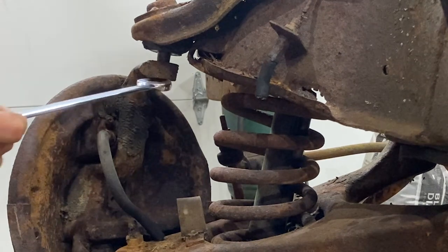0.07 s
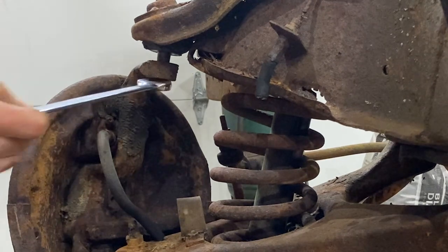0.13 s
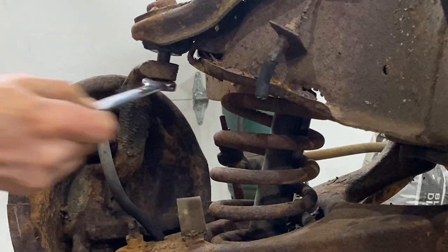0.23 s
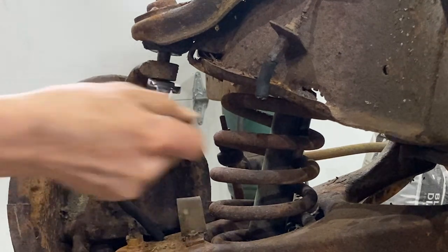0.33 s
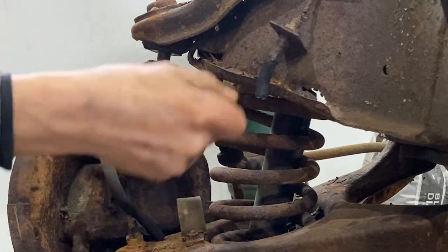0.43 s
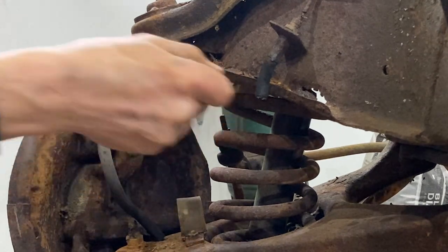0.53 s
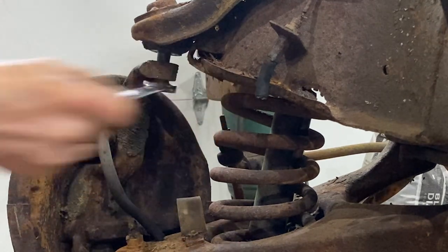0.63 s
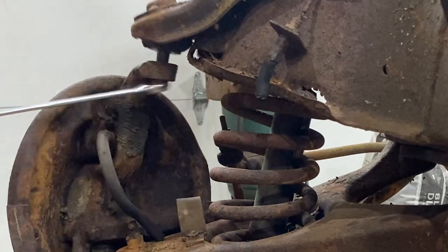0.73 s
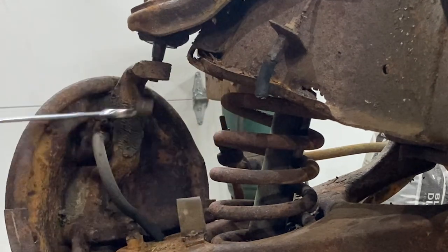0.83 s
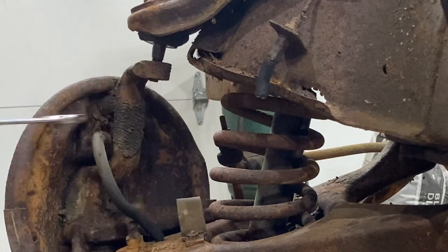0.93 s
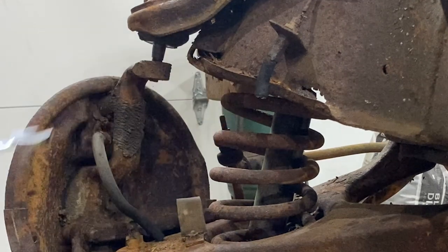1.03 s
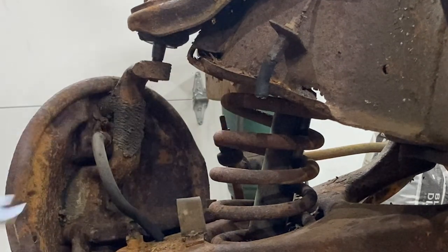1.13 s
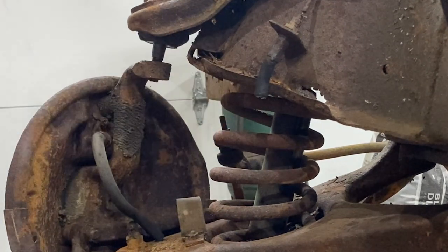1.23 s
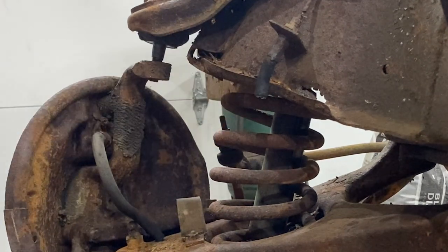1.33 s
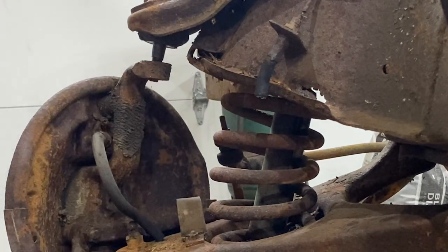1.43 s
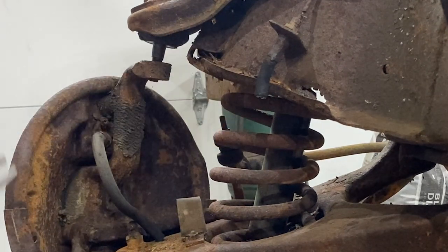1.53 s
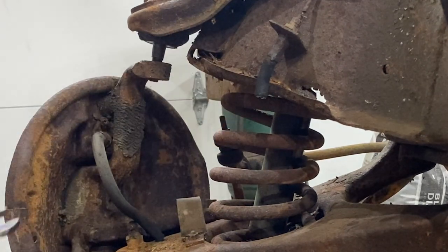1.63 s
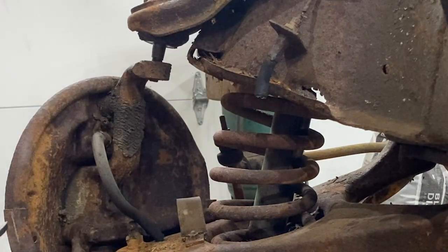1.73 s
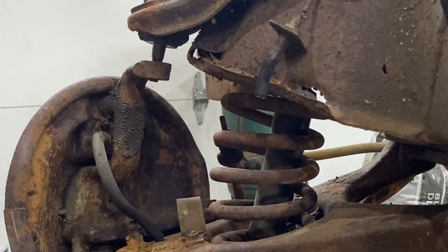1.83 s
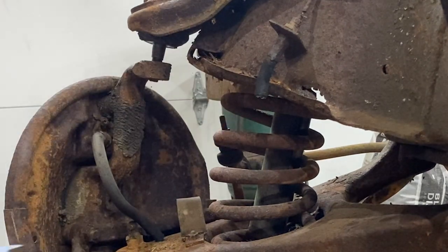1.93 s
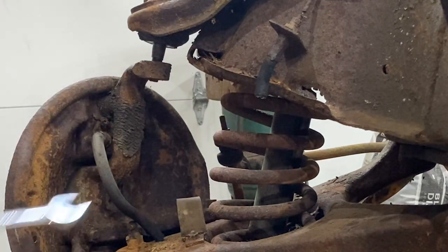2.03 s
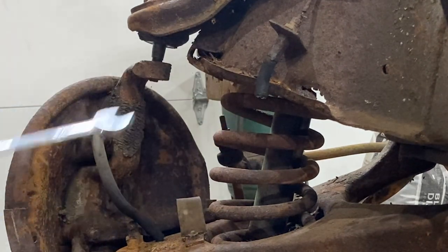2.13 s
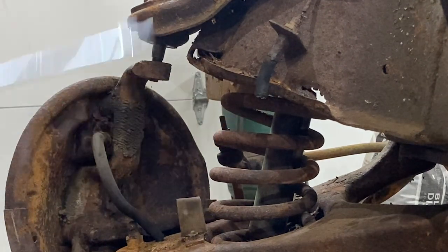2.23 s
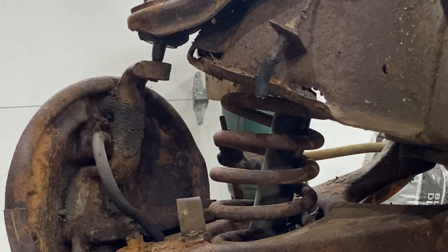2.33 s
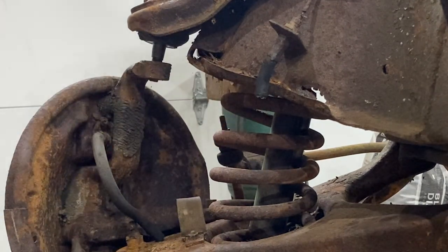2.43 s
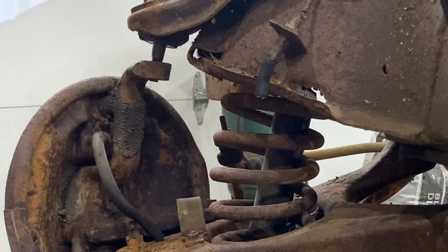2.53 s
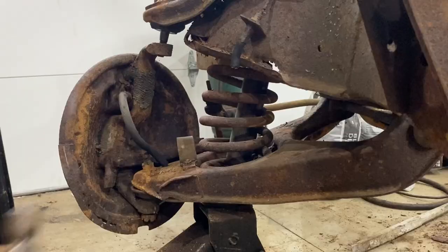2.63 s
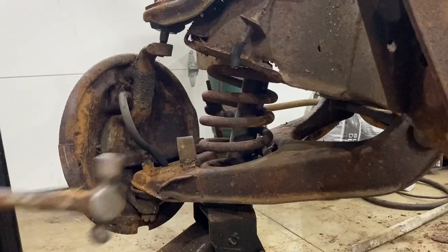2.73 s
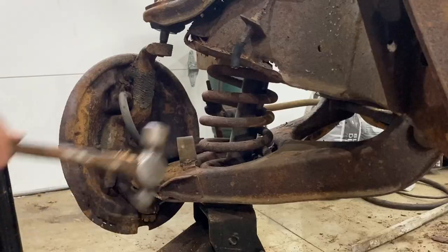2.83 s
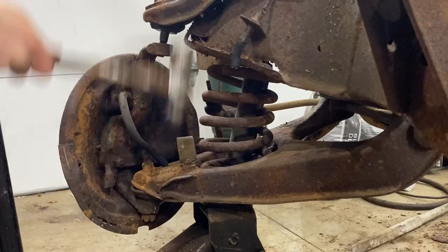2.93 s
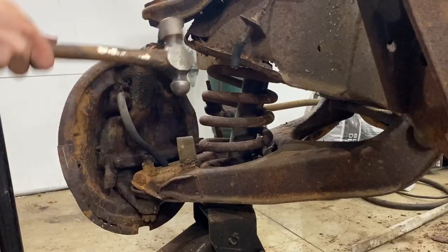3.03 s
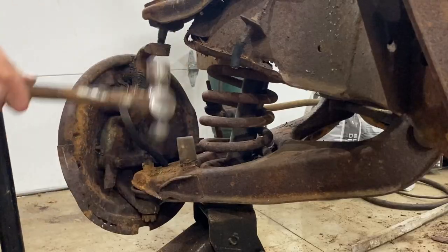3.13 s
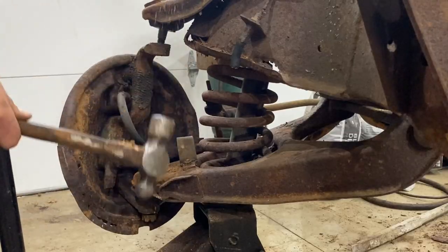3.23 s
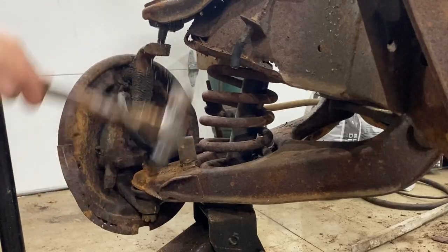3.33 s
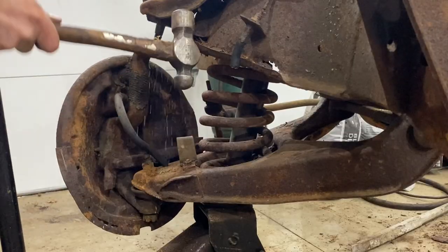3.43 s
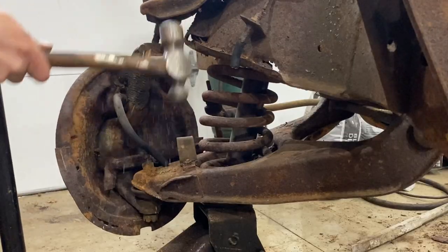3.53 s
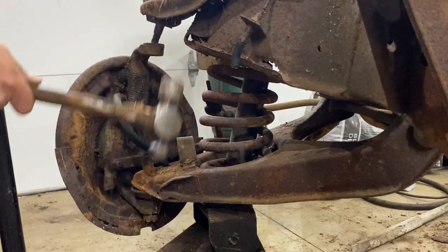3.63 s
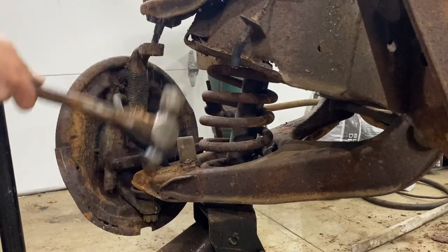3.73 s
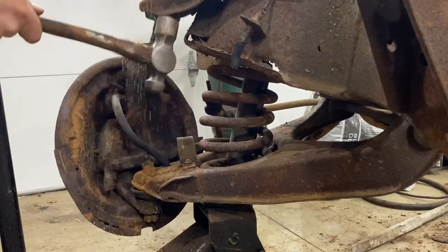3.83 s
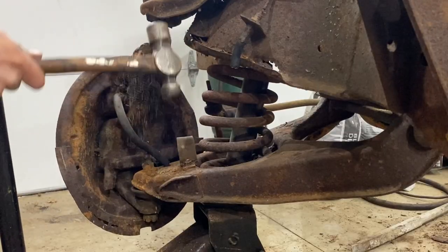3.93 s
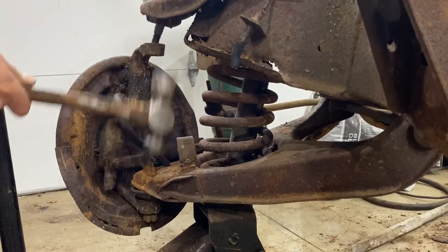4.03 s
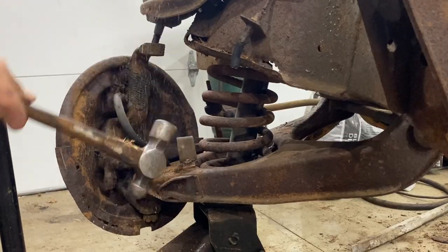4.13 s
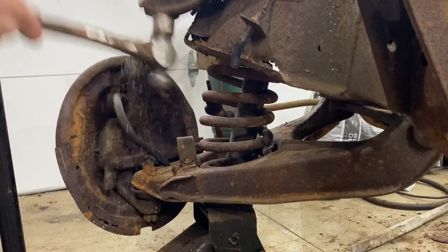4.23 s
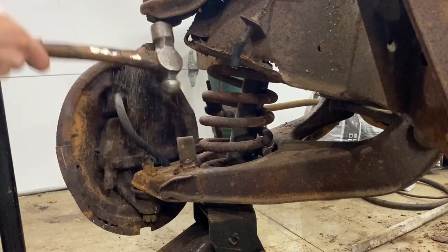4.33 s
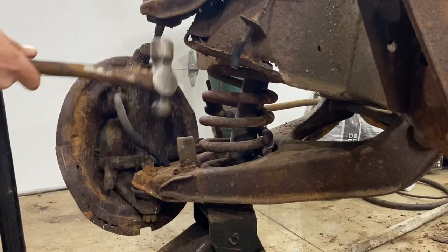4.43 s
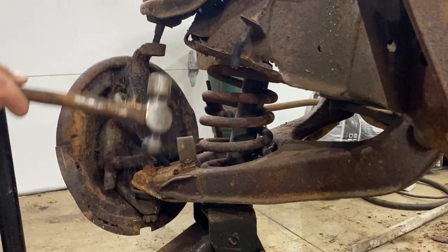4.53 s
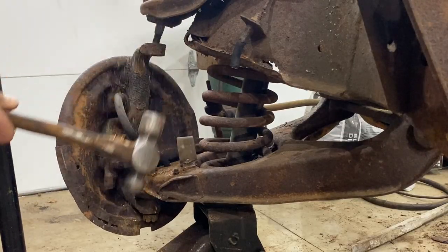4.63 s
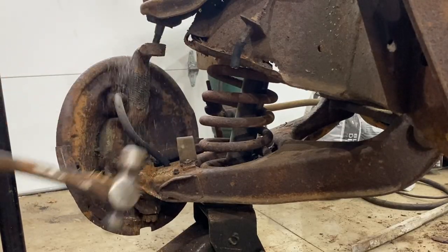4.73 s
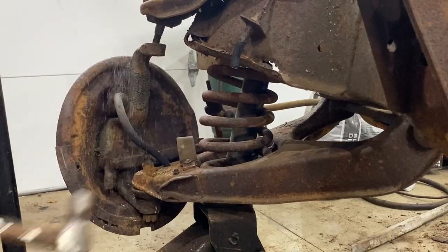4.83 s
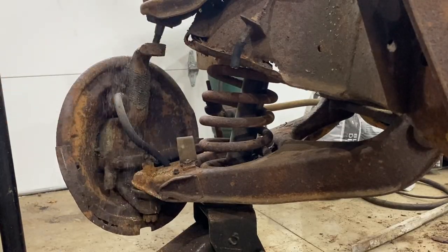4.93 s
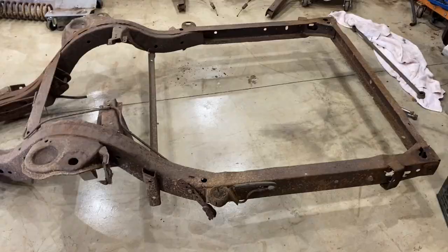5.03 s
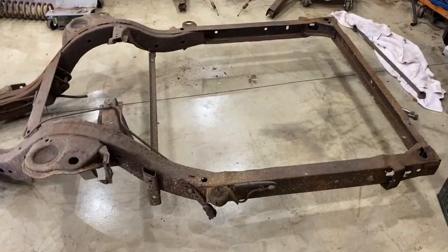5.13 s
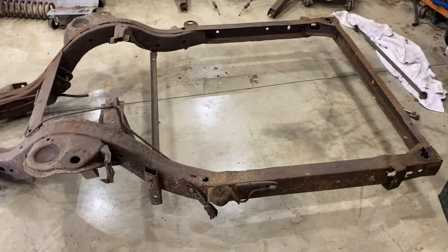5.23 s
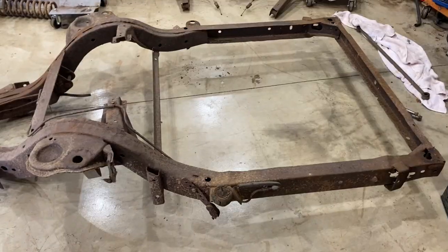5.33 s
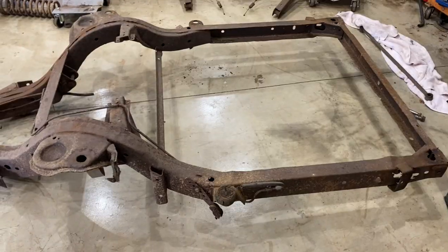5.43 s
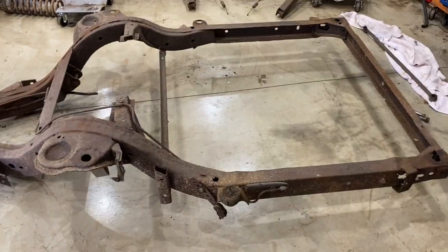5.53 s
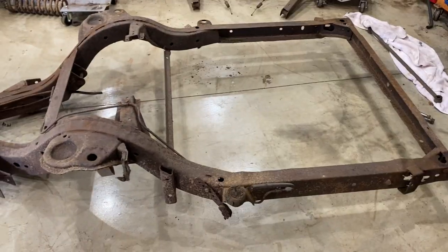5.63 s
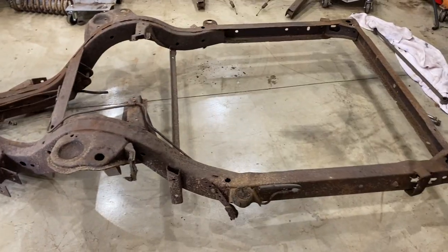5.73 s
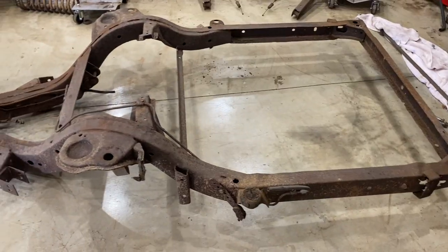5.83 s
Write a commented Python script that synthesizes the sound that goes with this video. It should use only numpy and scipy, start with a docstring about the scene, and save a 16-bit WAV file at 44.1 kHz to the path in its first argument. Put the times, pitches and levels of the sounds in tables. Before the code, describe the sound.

Stereo close recording with audible room noise: dull wrench clunks, one sharp knock, a hollow boom and scattered bright metallic clatter thinning out. Then four hammer strikes on thick rusty metal, the first two hardest, squeezed by automatic level control so the room's tail swells. Finally the tone switches abruptly to a low workshop hum with a faint whine.

```python
"""In a garage, a rusty front suspension is worked on. A wrench clinks on a nut, slips off and clatters down
over the steel, and hollow bodywork booms under a knock: each contact is decaying noise plus ringing modes,
weighted in bands. A steel hammer then hits the control arm four times; the recorder's limiter ducks the blows
and lets the room's tail rise again. Flakes of rust tick as short bursts of treble noise. Shaped noise is the
room tone; at about 5.1 s the background changes to a low steady hum, a sine with its own noise and a faint
whine."""
import sys
import numpy as np
from scipy import signal
from scipy.fft import rfft, irfft, next_fast_len
from scipy.io import wavfile
from scipy.ndimage import uniform_filter1d, minimum_filter1d

SR = 44100
rng = np.random.default_rng(int(sys.argv[2]) if len(sys.argv) > 2 else 0)


def dump_mix(stems):
    """Bounce the given channels to the path in sys.argv[1] as a 16-bit WAV at rate SR."""
    frames = np.atleast_2d(stems).T  # one column per channel
    limited = np.clip(frames, -1, 1)  # hard clip at full scale
    pcm = np.round(limited * 32767).astype(np.int16)
    wavfile.write(sys.argv[1], SR, pcm)


N = 258864

# Limits of the bands in which a contact is weighted. Each entry: frequency in Hz.
BAND_EDGES_HZ = [25, 200, 700, 1500, 3200, 6000, 10000, 16000]
# Centres of the same bands. Each entry: frequency in Hz.
BAND_CENTRES_HZ = [110, 400, 1050, 2200, 4400, 7700, 12600]

# Room tone near the wrench. Each row: frequency in Hz, relative spectral density in dB per Hz.
NEAR_TONE_SPECTRUM = [(25, -22.5), (60, -3), (95, 0.5), (150, -12.5), (300, -9.5), (600, -23.5),
                      (1200, -25.5), (2500, -29.5), (5500, -32.5), (8000, -34), (12000, -36),
                      (16000, -37.5)]
# Hushed room tone during and after the hammering. Each row: frequency in Hz, relative density in dB per Hz.
HUSHED_TONE_SPECTRUM = [(25, -16), (65, -2.5), (150, -18), (260, -1), (330, -3), (450, -17.5), (700, -22.5),
                        (2500, -36), (4000, -37), (16000, -46)]
# Steady tone beside the bare frame. Each row: frequency in Hz, relative density in dB per Hz.
FRAME_TONE_SPECTRUM = [(15, -41), (25, -14), (64, -6.5), (170, -24.5), (223, -27.5), (394, -36.5),
                       (439, -38), (545, -36.5), (677, -34), (887, -37.5), (962, -35), (1700, -38.5),
                       (2350, -36), (3080, -61), (16000, -84.5)]
# Course of the tone near the wrench. Each row: time in seconds, level in dB.
NEAR_TONE_LEVEL = [(0, -59), (.4, -49), (1.701, -52.5), (2.949, -53), (3.1, -56), (4.2, -61),
                   (4.599, -72.5)]
# Course of the hushed tone. Each row: time in seconds, level in dB.
HUSHED_TONE_LEVEL = [(3.0, -82.5), (3.301, -55), (5.081, -61.5), (5.102, -81.5)]
# Onset of the steady tone beside the frame. Each row: time in seconds, level in dB.
FRAME_TONE_LEVEL = [(5.1, -98.5), (5.122, -52.5)]
# Course of the faint whine beside the frame. Each row: time in seconds, level in dB.
WHINE_LEVEL = [(5.1, -120), (5.12, -72), (5.55, -89), (5.72, -66), (5.87, -68)]

# The wrench touches steel; a small part radiates little bass, a soft contact little treble.
# Each row: start in seconds, level in dB, bass corner in Hz, treble corner in Hz, clatter t60 in seconds,
# chassis ring in dB and wrench ring in dB, both against the clatter.
WRENCH_CONTACTS = [(0.071, -51.5, 693, 1000, 0.034, -10.5, -23.5), (0.092, -29, 685, 890, 0.3, 4.5, -15.5),
                   (0.138, -43, 710, 1710, 0.052, -17.5, -16), (0.167, -24.5, 680, 790, 0.15, -3.5, -17),
                   (0.4321, -11, 1900, 1470, 0.093, -11.5, -29), (0.801, -23.5, 150, 1500, 0.1, -17, -20.5),
                   (0.823, -32.5, 100, 3000, 0.37, -15, 0.5), (0.978, -32, 700, 1170, 0.13, -4, -26.5),
                   (1.029, -25.5, 600, 12000, 0.13, -6, -10.5),
                   (1.061, -34.5, 380, 15000, 0.03, -16, -12.5), (1.142, -31, 770, 5000, 0.096, -18, -18.5),
                   (1.2073, -15, 4450, 2500, 0.049, -5.5, -23),
                   (1.3068, -17.5, 2770, 3400, 0.039, -7.5, -14.5),
                   (1.345, -29, 3000, 1100, 0.12, -8.5, -18), (1.429, -25.5, 2000, 4800, 0.12, -10, -29),
                   (1.799, -17, 5400, 4740, 0.08, -9, -4), (1.855, -33, 3400, 3200, 0.18, -11.5, -30),
                   (2.062, -33.5, 1735, 2300, 0.1, -7.5, -3.5), (2.103, -42, 2900, 2600, 0.21, -10, -15.5),
                   (2.198, -33, 520, 14200, 0.082, -12, -11.5), (2.325, -42, 900, 6100, 0.078, -17.5, -15),
                   (2.33, -31.5, 400, 9100, 0.085, -7.5, -8.5), (2.408, -27, 2820, 3200, 0.12, -17, -11.5)]
# Spectrum shared by the wrench contacts. Each row: band centre in Hz, relative band level in dB.
WRENCH_SPECTRUM = [(110, -14.5), (400, -6.5), (1050, -2), (2200, -3.5), (4400, 1), (7700, -2),
                   (12600, -4.5)]
# Modes of the suspension and frame. Each row: frequency in Hz, relative level in dB, t60 in seconds.
CHASSIS_MODES = [(444.5, -7, 0.32), (501.5, -5, 0.19), (806, -24, 0.36), (986, -13.5, 0.18),
                 (1190, -7.5, 0.17), (1280, -13.5, 0.032), (1587, -18.5, 0.52), (2010, -16.5, 0.16),
                 (2790, -21, 0.21), (2717, -6.5, 0.1), (2695, -1, 0.075), (3410, -20.5, 0.31),
                 (3156, -24.5, 0.28), (4440, -13, 0.12), (4300, -24, 0.25), (4850, -24, 0.13),
                 (4660, -17.5, 0.096), (4640, -27.5, 0.27), (5070, -27.5, 0.066), (6770, -25.5, 0.16),
                 (10700, -24.5, 0.1)]
# Modes of the wrench. Each row: frequency in Hz, relative level in dB, t60 in seconds.
WRENCH_MODES = [(834, -22.5, 0.54), (1078, -13.5, .14), (1600, -15.5, 0.41), (2046, -31.5, .3),
                (2460, -13, 0.55), (2540, -23.5, .15), (2670, -20, .17), (3000, -31, 0.26),
                (4110, -19, 0.091), (4000, -9.5, 0.13), (3880, -21.5, .23), (4260, -29.5, 0.32),
                (4880, -19.5, 0.24), (4840, -23, 0.14), (7360, -15, 0.28), (7100, -29, 0.65),
                (7407, -30, 0.5), (8200, -18, 0.071), (11140, -22, 0.12), (14600, -26, 0.19)]
# Colour of the clatter of rusty steel. Each row: frequency in Hz, relative level in dB.
STEEL_COLOUR = [(60, -1.5), (250, 2), (420, 6), (530, 7.5), (700, -8.5), (950, 1), (1250, -1), (1700, 3.5),
                (2100, 6), (2600, 1.5), (3300, -5.5), (5000, -8.5), (8000, -10), (15000, -27)]

# Dull knocks on hollow steel. Each row: start in seconds, level in dB, brightness in dB per octave.
THUMPS = [(0.776, -22.5, 1), (0.917, -51.5, -6.5), (5.162, -71, -4), (5.245, -76, -1)]
# Spectrum shared by the knocks. Each row: band centre in Hz, relative band level in dB.
THUMP_SPECTRUM = [(110, -0.5), (400, 8), (1050, 2), (2200, -6), (4400, -9.5), (7700, -16.5), (12600, -24.5)]
# Modes of the hollow bodywork. Each row: frequency in Hz, relative level in dB, t60 in seconds.
PANEL_MODES = [(61.88, -10, .4), (82, -8.5, 0.74), (110.4, -13.5, 1), (137.2, -8.5, 0.35), (189, -3, 0.082),
               (221, -7, 0.26), (355.7, -0.5, 0.073), (377, -8, .22), (477.7, -6.5, 0.074),
               (557, 1.5, 0.028), (755, -1.5, 0.17), (806.4, -16, 0.51), (1060, -12, .2),
               (1282, -15.5, 0.35), (1190, -10, 0.29), (2880, 1.5, 0.11)]

# Decay of the garage. Each row: frequency in Hz, t60 in seconds.
GARAGE_T60 = [(100, 4.5), (350, 0.7252), (1000, 0.5959), (2500, 0.7358), (5000, 0.55), (8000, 0.42),
              (14000, 0.09)]
# Colour of the garage's tail. Each row: frequency in Hz, relative level in dB.
GARAGE_COLOUR = [(100, -39.5), (230, -21.5), (340, -4), (420, -12.5), (500, -8), (640, -15.5), (850, -16.5),
                 (1150, -11.5), (1600, -13.5), (2400, -10), (3400, -17), (5000, -12.5), (8000, -14.5),
                 (14000, -18)]

# Hammer blows. Each row: start in seconds, level before the limiter in dB, brightness in dB per octave,
# level of a short lead-in tone in dB.
HAMMER_BLOWS = [(3.002, 15, -0.83, -2), (3.431, 7.5, -0.55, 2), (3.8513, -1.5, -0.15, -9.5),
                (4.279, -2, 0, -18)]
# Spectrum shared by the blows. Each row: band centre in Hz, relative band level in dB.
HAMMER_SPECTRUM = [(110, -19), (400, -6.5), (1050, 0.5), (2200, -6.5), (4400, -13), (7700, -16),
                   (12600, -20)]
# Modes of the control arm. Each row: frequency in Hz, relative level in dB, t60 in seconds.
ARM_MODES = [(80.86, -17, 0.026), (152.6, -15.5, 0.034), (258.2, -12.5, .2), (284.3, -26.5, 0.72),
             (372, -6.5, 0.22), (454, -13.5, 0.27), (487, -5, 0.09), (649, -19.5, 0.16), (821, -17.5, 0.31),
             (1098, 3, .025), (1176, 7, 0.071), (1362, 2, 0.052), (1450, 1.5, 0.024), (1624, -2.5, 0.07),
             (1772, 0, .025), (2430, -0.5, 0.04), (2630, -4, 0.057), (4676, -27.5, 0.021),
             (6660, -23.5, .025)]

# Rust flakes landing. Each row: start in seconds, level in dB before the bass is removed.
FLAKES = [(3.702, -32), (3.799, -41), (4.185, -51.5), (4.776, -49)]

# Likeness of left and right in diffuse sound. Each row: frequency in Hz, correlation from 0 to 1.
LIKENESS = [(60, 0.98), (250, .8), (600, 0.4), (1200, 0), (2500, 0.8), (5000, 0.91), (15000, 1)]
# Phase of the left microphone port against the right one. Each row: frequency in Hz, phase in radians.
PORT_PHASE = [(0, 0), (1400, 0), (2500, .45), (4200, .22), (7200, -.15), (9050, -3.14), (11200, -6.28),
              (13300, -9.42), (15300, -12.57)]

CUTOFF_HZ = 16500
WRENCH_LEFT_DB = 1  # left channel above right
RING_TIME = np.arange(int(0.7 * SR)) / SR  # seconds
ATTACK_SIZE = int(0.025 * SR)  # samples


def from_db(db):
    """Amplitude ratio: 20 dB is a factor of ten."""
    return 10 ** (np.asarray(db) / 20)


def rms(x):
    """Root mean square, the effective amplitude."""
    return np.sqrt(np.mean(x ** 2) + 1e-20)


def at_hz(points, hz):
    """Linear interpolation of a table over the logarithm of frequency."""
    table_hz, values = np.transpose(points)
    return np.interp(np.log(hz + 1e-6), np.log(table_hz), values)


def in_time(rows):
    """Linear interpolation of a table over time."""
    return np.interp(np.arange(N) / SR, *np.transpose(rows))


def decay(t, t60):
    """Exponential damping: the amplitude falls by 60 dB in t60 seconds."""
    return np.exp(-np.log(1000) * t / max(t60, 1e-3))


def band(x, low, high):
    """Band-pass filtering between two frequencies in Hz."""
    sos = signal.butter(3, [low, min(high, 0.49 * SR)], "band", fs=SR, output="sos")
    return signal.sosfilt(sos, x)


def add(out, s, sound):
    """Superposition: a stereo sound is summed in from time s."""
    start = max(round(s * SR), 0)
    out[:, start:start + sound.shape[1]] += sound[:, :N - start]


def diffuse(size, spectrum=None):
    """Diffuse field: noise of rms 1 whose two channels correlate by a frequency-dependent amount."""
    padded = next_fast_len(size)
    hz = np.fft.rfftfreq(padded, 1 / SR)
    mid, side = rfft(rng.standard_normal((2, padded)))
    alike = np.clip(at_hz(LIKENESS, hz), 0, 1)
    pair = np.sqrt(1 + alike) * mid + np.sqrt(1 - alike) * side * [[1], [-1]]
    if spectrum is not None:
        pair = pair * from_db(at_hz(spectrum, hz))
    noise = irfft(pair, padded)[:, :size]
    return noise / rms(noise)


def room_tone(hum_hz, hum_db, whine_hz):
    """Stationary noise: rumble and hiss of the workshop; from about 5.1 s also a low hum and a whine."""
    t = np.arange(N) / SR
    tones = [
        (NEAR_TONE_SPECTRUM, NEAR_TONE_LEVEL),
        (HUSHED_TONE_SPECTRUM, HUSHED_TONE_LEVEL),
        (FRAME_TONE_SPECTRUM, FRAME_TONE_LEVEL),
    ]
    noise = sum(diffuse(N, spectrum) * from_db(in_time(level)) for spectrum, level in tones)
    hum = from_db(hum_db + in_time(FRAME_TONE_LEVEL)) * np.sin(2 * np.pi * hum_hz * t)
    whine = from_db(in_time(WHINE_LEVEL)) * np.sin(2 * np.pi * whine_hz * t)
    return noise + hum + whine


def ring(modes, spread_db):
    """Modal excitation: each blow lands elsewhere and gives the damped modes new strengths and signs."""
    out = np.zeros((2, len(RING_TIME)))
    for hz, level_db, t60 in modes:
        strength = from_db(level_db + spread_db * rng.standard_normal()) * rng.choice([-1, 1])
        unlikeness = np.clip(1 - at_hz(LIKENESS, hz), 0, 1)
        skew = rng.standard_normal() * np.sqrt(unlikeness) / 2  # radians, opposite in the two channels
        phase = 2 * np.pi * hz * RING_TIME + [[skew], [-skew]]
        out += strength * decay(RING_TIME, t60) * np.sin(phase)
    return out


def clatter(t60):
    """High modal density: decaying noise stands for countless modes of bolted steel and nearby echoes."""
    return diffuse(len(RING_TIME), STEEL_COLOUR) * decay(RING_TIME, t60)


def coloured(blow, band_dbs):
    """Contact spectrum: hardness and place of a contact set the rms of its first 25 ms in each band."""
    out = 0
    for low, high, level_db in zip(BAND_EDGES_HZ, BAND_EDGES_HZ[1:], band_dbs):
        part = band(blow + 1e-12, low, high)
        out = out + part * from_db(level_db) / rms(part[:, :ATTACK_SIZE])
    return out


def between_corners(level_db, bass_hz, treble_hz):
    """Radiation and contact limits: band levels fall 6 dB an octave below the bass corner, 12 above the treble."""
    hz = np.array(BAND_CENTRES_HZ)
    gains = from_db(at_hz(WRENCH_SPECTRUM, hz))
    gains = gains / np.hypot(1, bass_hz / hz) / np.hypot(1, (hz / treble_hz) ** 2)
    # the powers of all bands sum to the contact's level
    return level_db + 20 * np.log10(gains / np.linalg.norm(gains))


def wrench(crack_db, crack_t60, rise_s):
    """Coupled bodies: every contact cracks and clatters, and sets both chassis and wrench ringing."""
    out = np.zeros((2, N))
    for s, level_db, bass_hz, treble_hz, t60, chassis_db, wrench_db in WRENCH_CONTACTS:
        blow = clatter(t60) + from_db(crack_db) * clatter(crack_t60)
        blow += from_db(chassis_db) * ring(CHASSIS_MODES, spread_db=4.5)
        blow += from_db(wrench_db) * ring(WRENCH_MODES, spread_db=4.0)
        blow *= 1 - np.exp(-RING_TIME / rise_s)
        add(out, s, coloured(blow, between_corners(level_db, bass_hz, treble_hz)))
    return out * from_db([[WRENCH_LEFT_DB / 2], [-WRENCH_LEFT_DB / 2]])


def garage(x, wet_db, build_s):
    """Reverberation: a diffuse tail builds up briefly and dies at its own pace in each band."""
    t = np.arange(SR) / SR
    noise, response = diffuse(len(t)), 0
    edges = np.geomspace(50, 17000, 17)
    for low, high in zip(edges, edges[1:]):
        hz = np.sqrt(low * high)
        shape = decay(t, at_hz(GARAGE_T60, hz)) * (1 - np.exp(-t / build_s))
        shape = shape / np.sqrt(np.sum(shape ** 2))
        response = response + band(noise, low, high) * shape * from_db(at_hz(GARAGE_COLOUR, hz))
    mono = x.mean(0)[None]
    return from_db(wet_db) * signal.fftconvolve(mono, response, axes=1)[:, :N]


def limiter(x, ceiling_db, release_db_per_s):
    """Gain control: the gain drops just ahead of a peak; a slow return holds the dying tail level for a while."""
    power = uniform_filter1d(np.mean(x ** 2, axis=0), size=176)  # 4 ms
    over_db = np.maximum(10 * np.log10(np.maximum(power, 1e-12)) - ceiling_db, 0)
    # a running maximum on a rising ramp makes the cut recede at the release rate
    ramp = release_db_per_s * np.arange(N) / SR
    cut_db = np.maximum.accumulate(over_db + ramp) - ramp
    early_gain_db = minimum_filter1d(-cut_db, size=400)
    return x * from_db(uniform_filter1d(early_gain_db, size=120))


def tilted(spectrum, level_db, db_per_octave):
    """Spectral slope: the shared band levels tip about 1 kHz, a harder contact more towards the treble."""
    hz = np.array(BAND_CENTRES_HZ)
    octaves = np.log2(hz / 1000)
    return level_db + at_hz(spectrum, hz) + db_per_octave * octaves


def thump(clatter_t60, ring_db):
    """Panel resonance: hollow sheet metal booms under a dull knock."""
    out = np.zeros((2, N))
    for s, level_db, brightness in THUMPS:
        knock = clatter(clatter_t60) + from_db(ring_db) * ring(PANEL_MODES, spread_db=1.5)
        add(out, s, coloured(knock, tilted(THUMP_SPECTRUM, level_db, brightness)))
    return out


def lead_in(hz, ahead_s, width_s, left_db):
    """Windowed sine: a very short tone, mostly on the right, peaks just ahead of each blow."""
    t, envelope = np.arange(N) / SR, np.zeros(N)
    for s, _, _, lead_db in HAMMER_BLOWS:
        envelope += from_db(lead_db) * np.exp(-np.minimum(abs(t - s + ahead_s) / width_s, 20))
    return envelope * np.sin(2 * np.pi * hz * t) * from_db([[left_db], [0]])


def hammer(crack_db, crack_t60, crack_low_hz, clatter_t60, ring_db,
           rattle_db, rattle_t60, rattle_top_hz, wet_db):
    """Impact of hard bodies: a very short crack, a clang, the rattle of bolted parts, and the room's tail."""
    direct, radiated = np.zeros((2, N)), np.zeros((2, N))
    pulse = np.tile(signal.unit_impulse(len(RING_TIME)), (2, 1))
    for s, level_db, brightness, _ in HAMMER_BLOWS:
        band_dbs = tilted(HAMMER_SPECTRUM, level_db, brightness)
        crack = from_db(crack_db) * band(clatter(crack_t60), crack_low_hz, CUTOFF_HZ)
        clang = clatter(clatter_t60) + from_db(ring_db) * ring(ARM_MODES, spread_db=2.0)
        rattle = from_db(rattle_db) * band(clatter(rattle_t60), 280, rattle_top_hz)
        add(direct, s, coloured(crack + clang + rattle, band_dbs))
        # summed over all directions, the peaks and dips of the whole chassis even out
        add(radiated, s, coloured(pulse, band_dbs))
    return direct + garage(radiated, wet_db, build_s=0.0014)


def flakes(t60, low_hz):
    """Impact of light bodies: bits of rust shaken loose land with thin ticks, free of bass."""
    out = np.zeros((2, N))
    for s, level_db in FLAKES:
        add(out, s, from_db(level_db) * band(clatter(t60) + 1e-12, low_hz, CUTOFF_HZ))
    return out


def scene():
    """Superposition of room tone, the limited small contacts in the garage, and the limited blows."""
    tone = room_tone(hum_hz=57.3, hum_db=-1.0, whine_hz=2370)
    small = wrench(crack_db=1.5, crack_t60=0.023, rise_s=0.00028)
    small += thump(clatter_t60=0.33, ring_db=-1.0)
    small += flakes(t60=0.04, low_hz=3700)
    small_in_room = small + garage(small, wet_db=3.0, build_s=0.0027)
    loosening = limiter(small_in_room, ceiling_db=-8.0, release_db_per_s=297.5)
    blows = hammer(crack_db=18.5, crack_t60=0.0023, crack_low_hz=3200, clatter_t60=0.088, ring_db=-0.5,
                   rattle_db=-0.5, rattle_t60=0.21, rattle_top_hz=2670, wet_db=-1.0)
    hammering = limiter(blows, ceiling_db=-7.5, release_db_per_s=73)
    hammering += lead_in(hz=1420, ahead_s=0.0028, width_s=0.0013, left_db=-20)
    return loosening + hammering + tone


def record(dry):
    """Two-port reception: the microphone ports part in phase in the treble; peaks clip; the top is cut."""
    spectrum = rfft(dry)
    hz = np.fft.rfftfreq(N, 1 / SR)
    spectrum[0] *= np.exp(1j * np.interp(hz, *np.transpose(PORT_PHASE)))
    clipped = np.clip(irfft(spectrum, N), -1, 1)
    low_pass = signal.ellip(10, 0.2, 80, CUTOFF_HZ, fs=SR, output="sos")
    return signal.sosfilt(low_pass, clipped)


dry = scene()
out = record(dry)
dump_mix(out)
```